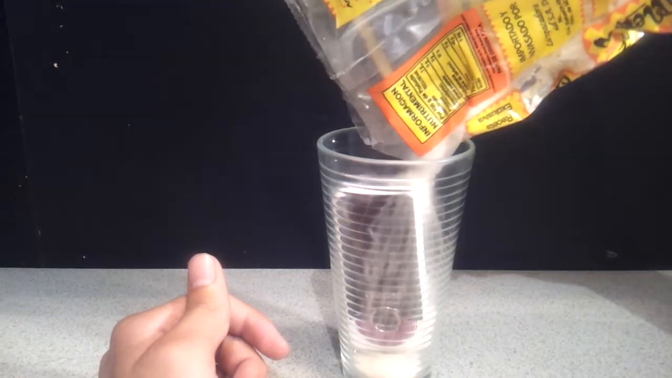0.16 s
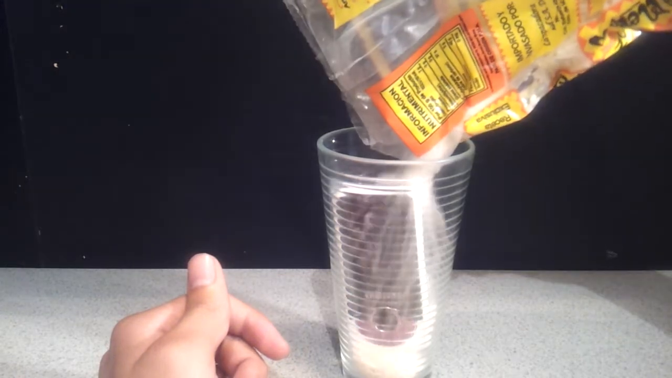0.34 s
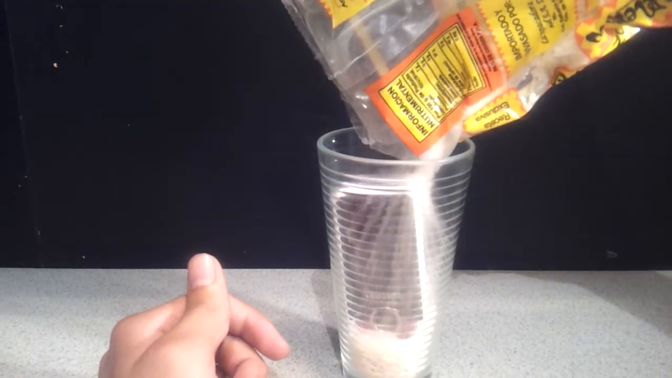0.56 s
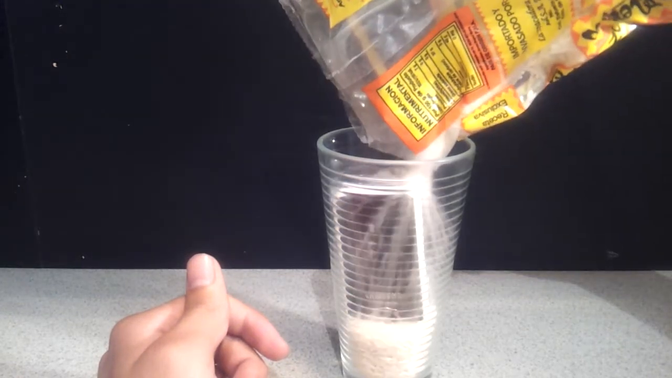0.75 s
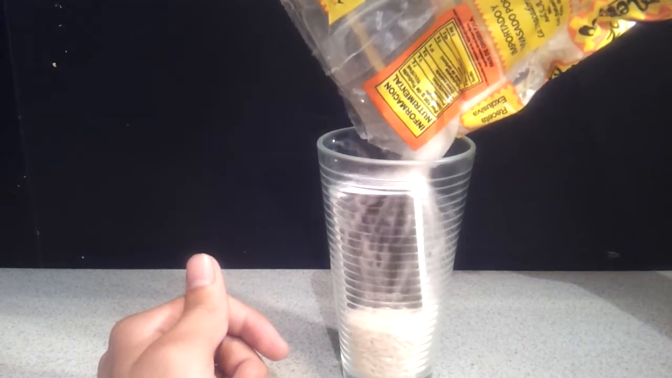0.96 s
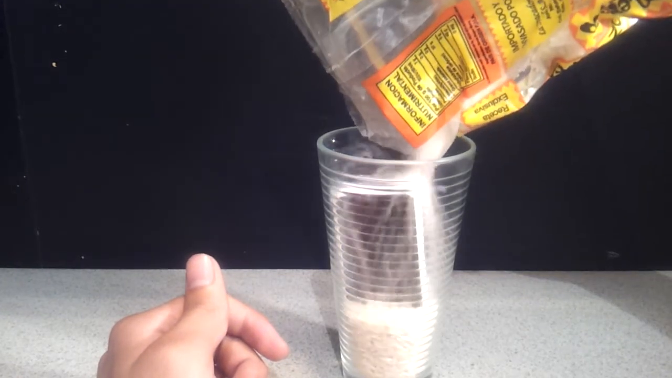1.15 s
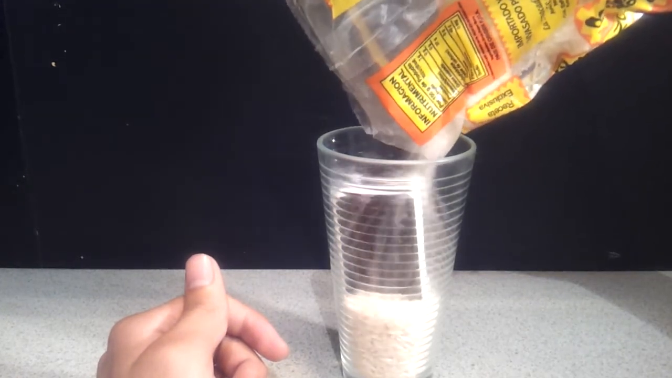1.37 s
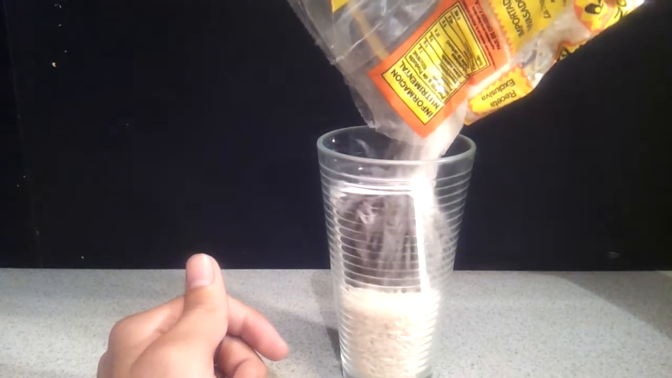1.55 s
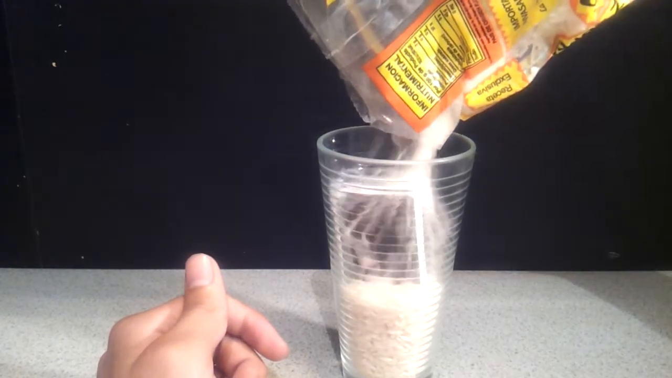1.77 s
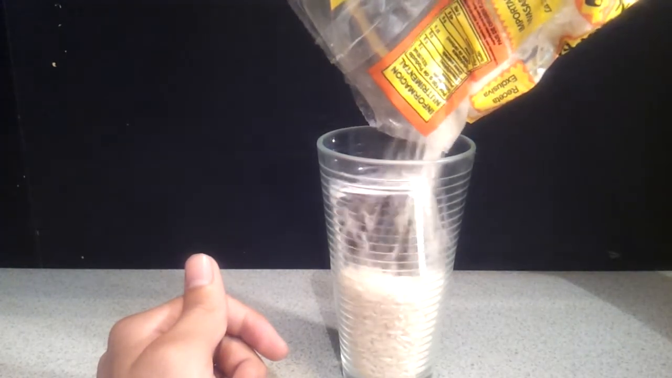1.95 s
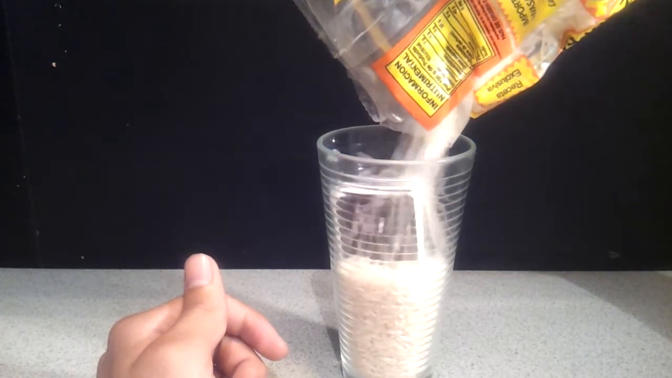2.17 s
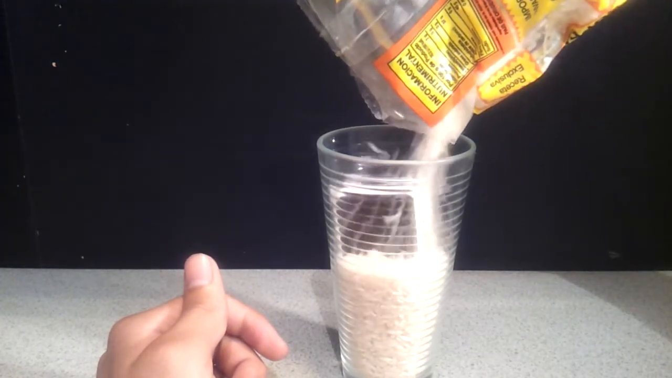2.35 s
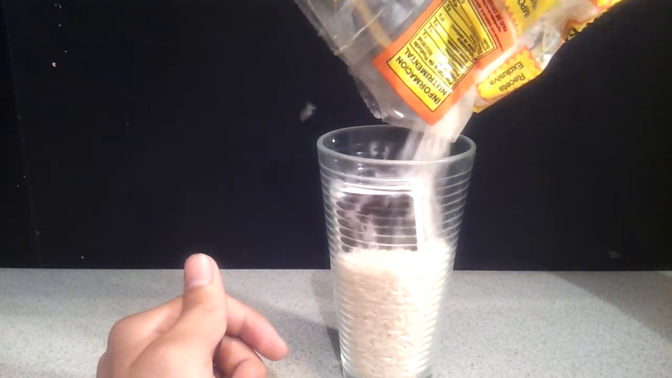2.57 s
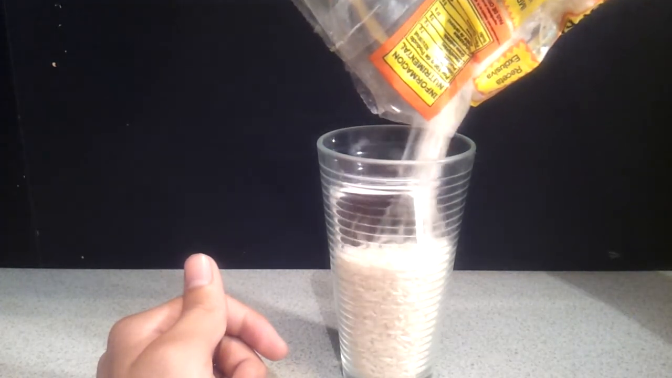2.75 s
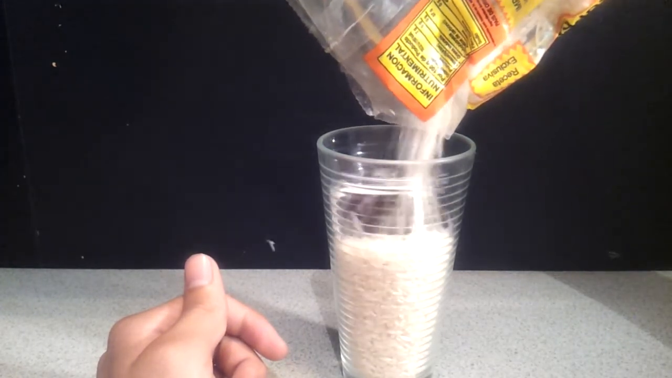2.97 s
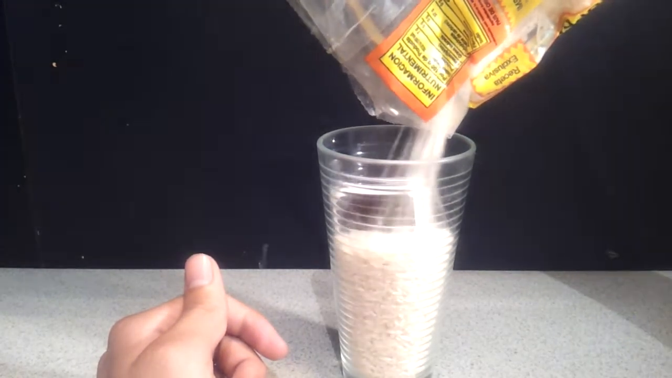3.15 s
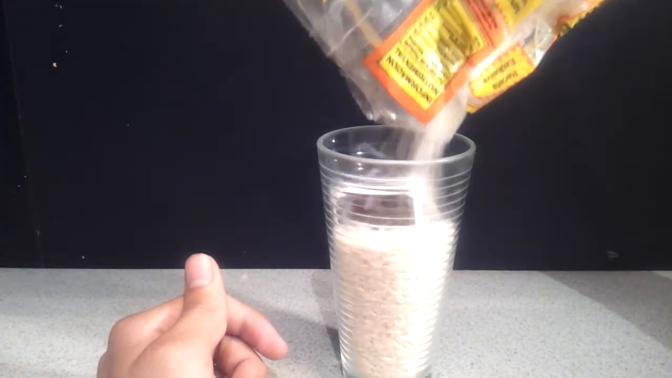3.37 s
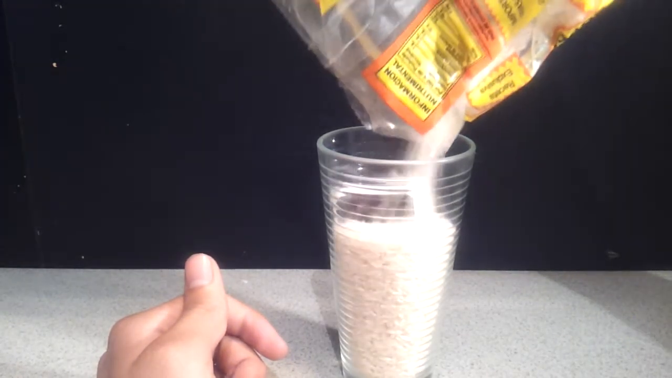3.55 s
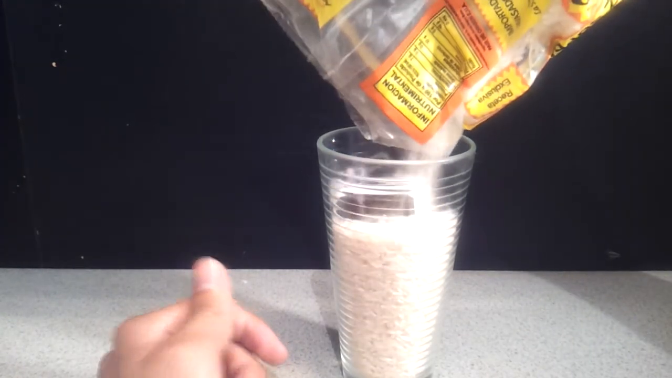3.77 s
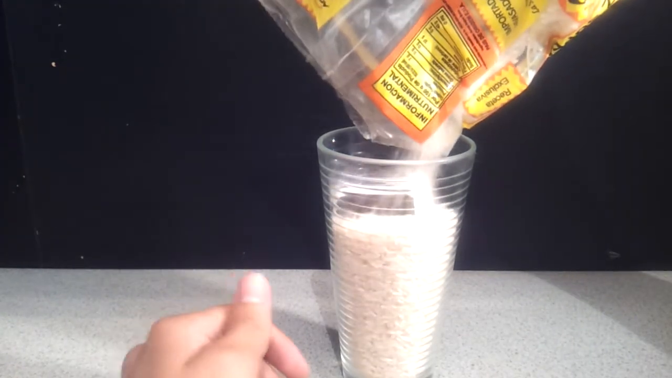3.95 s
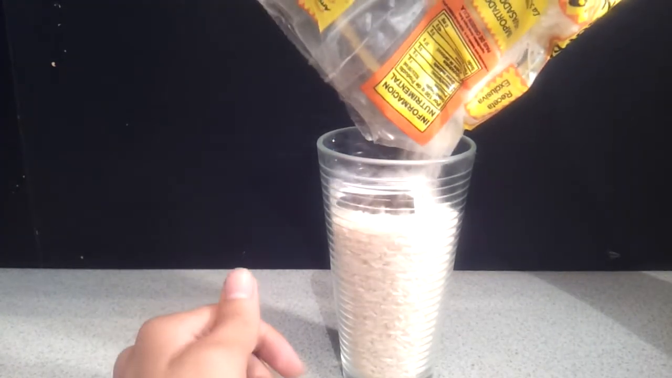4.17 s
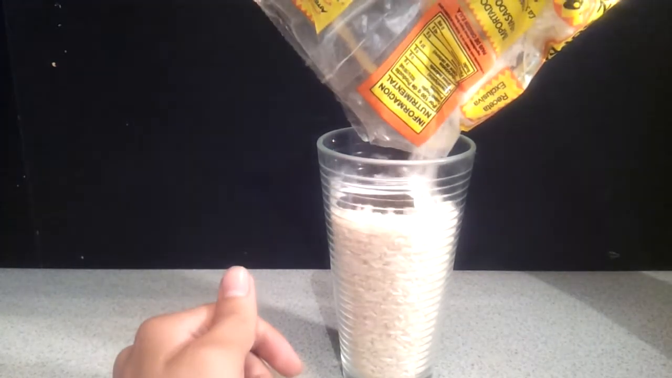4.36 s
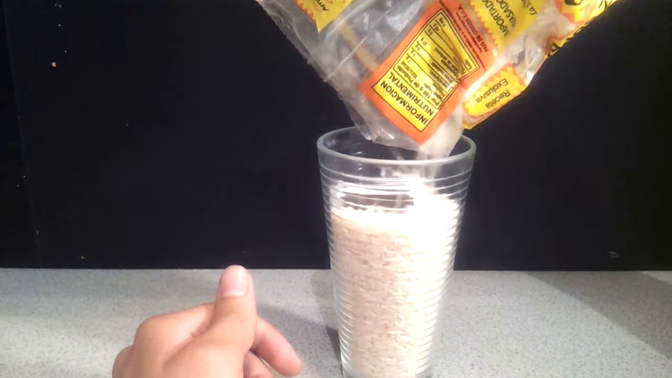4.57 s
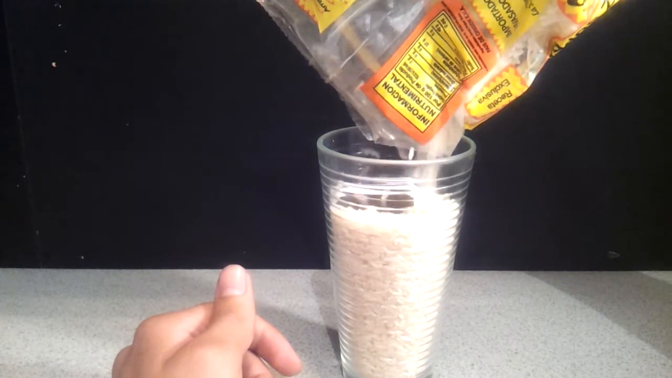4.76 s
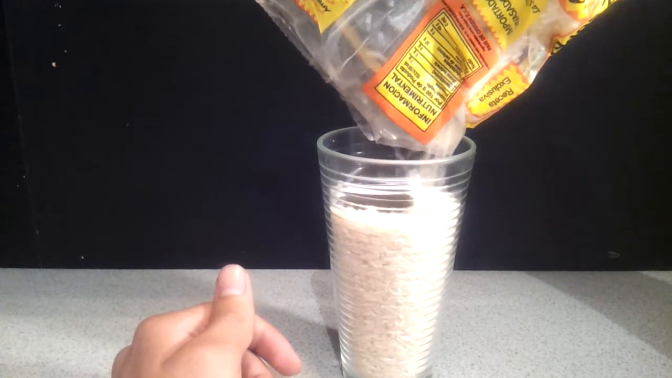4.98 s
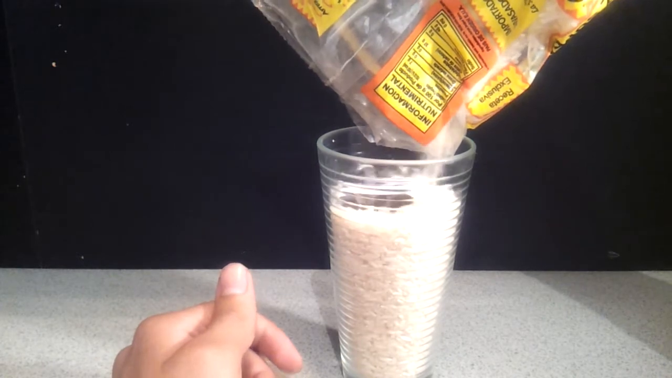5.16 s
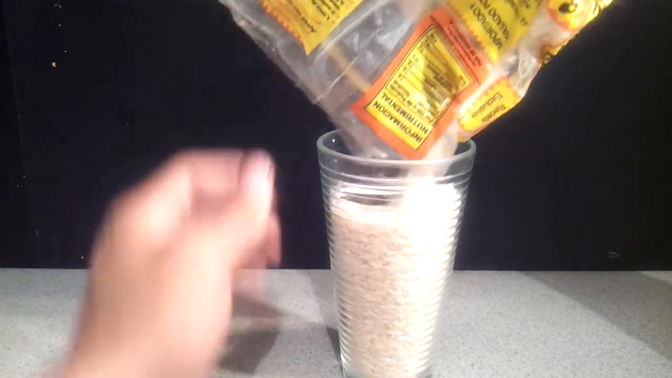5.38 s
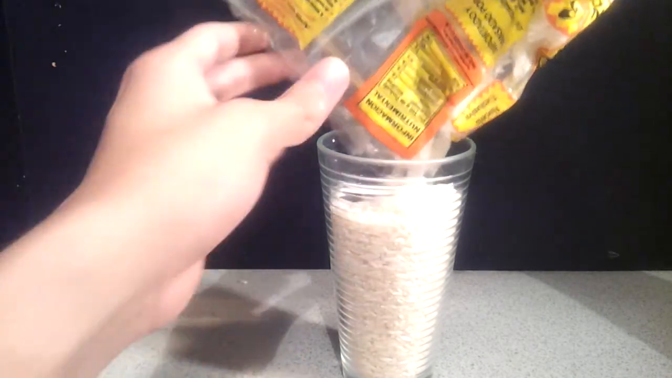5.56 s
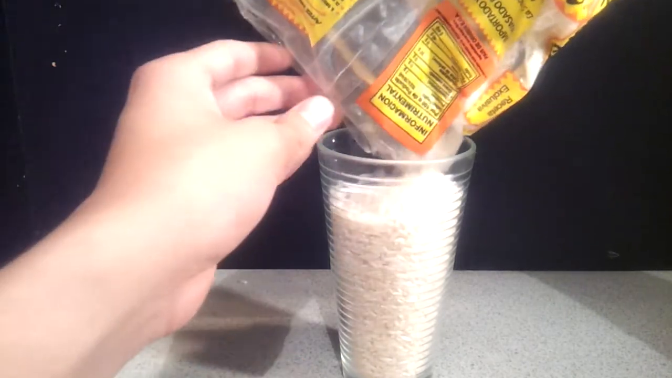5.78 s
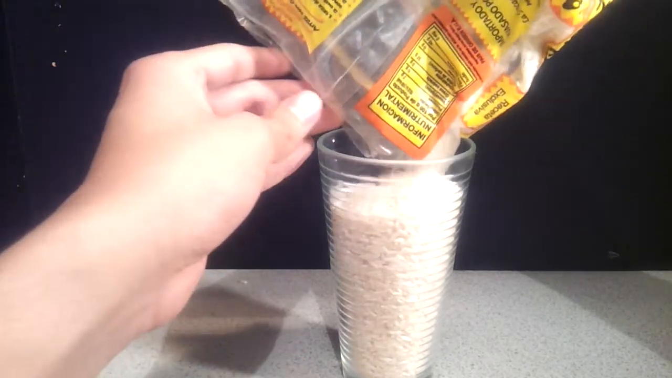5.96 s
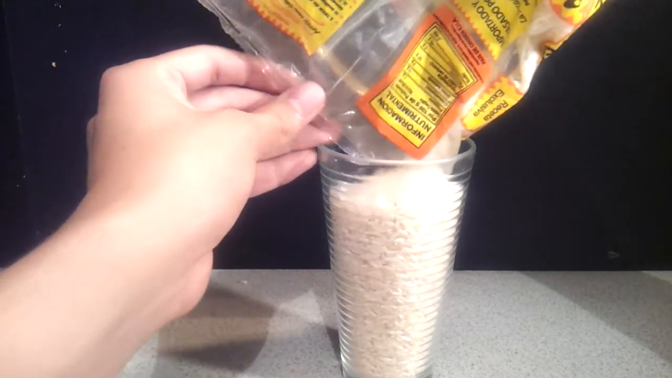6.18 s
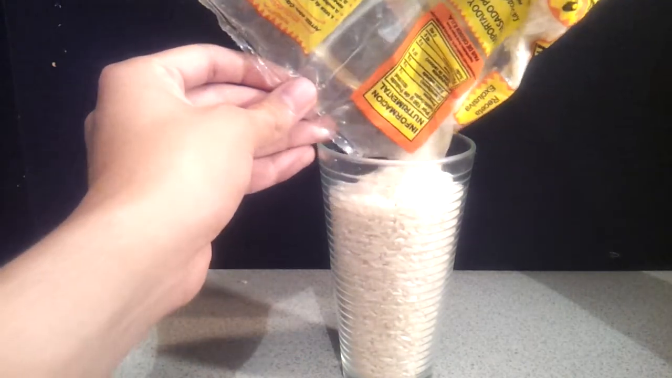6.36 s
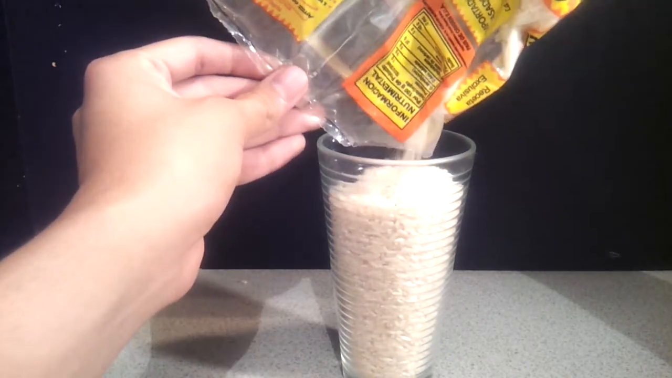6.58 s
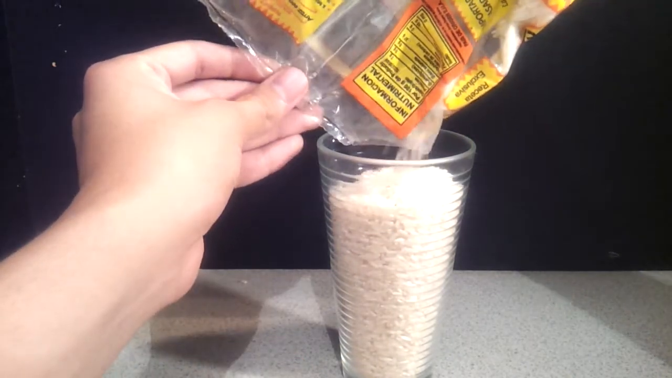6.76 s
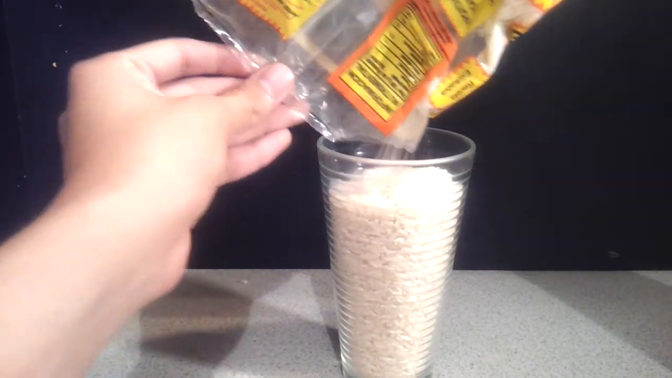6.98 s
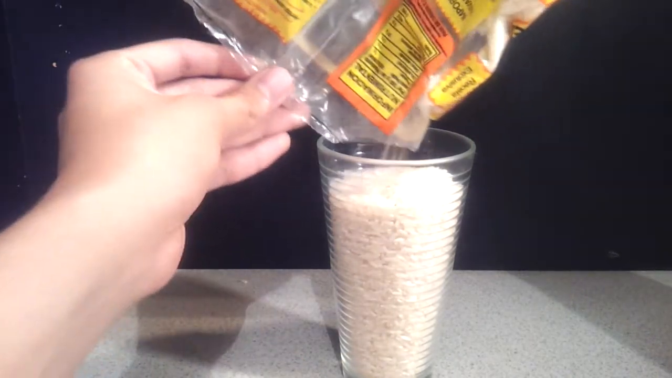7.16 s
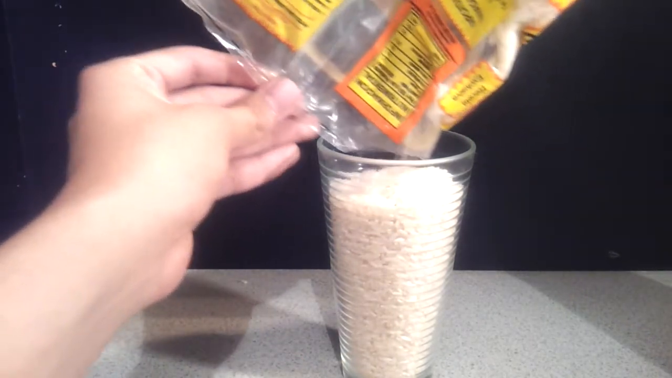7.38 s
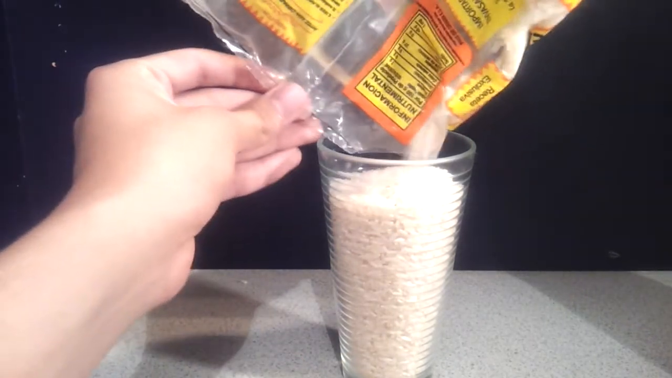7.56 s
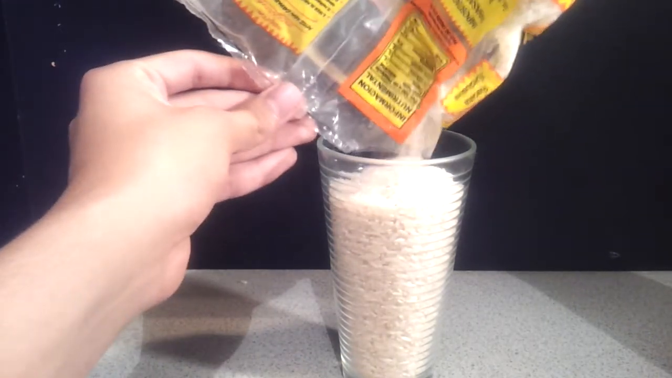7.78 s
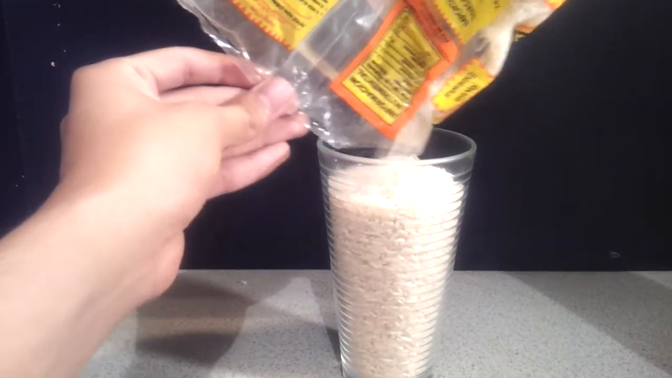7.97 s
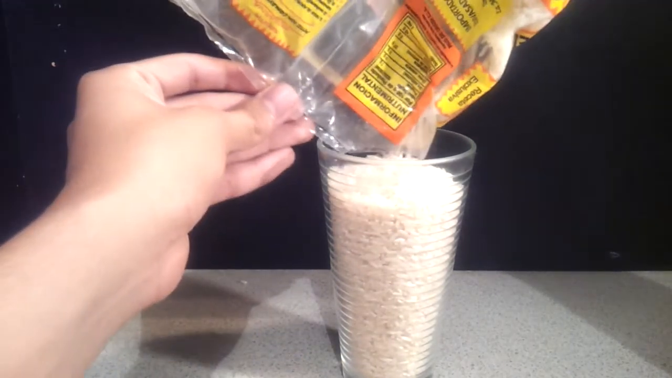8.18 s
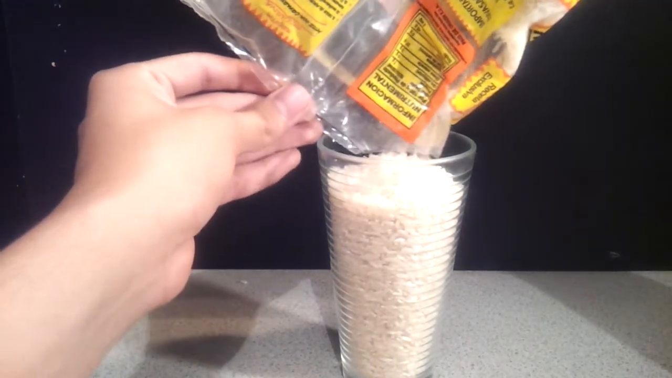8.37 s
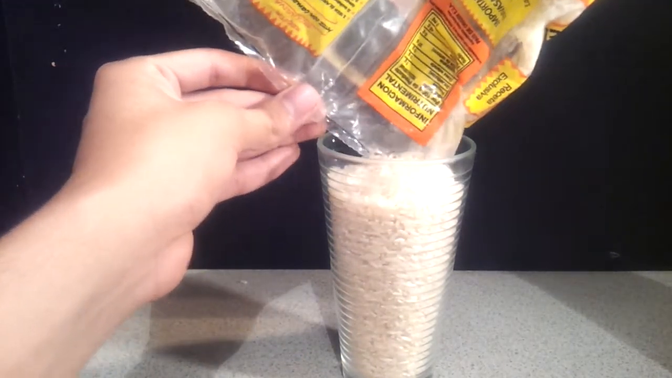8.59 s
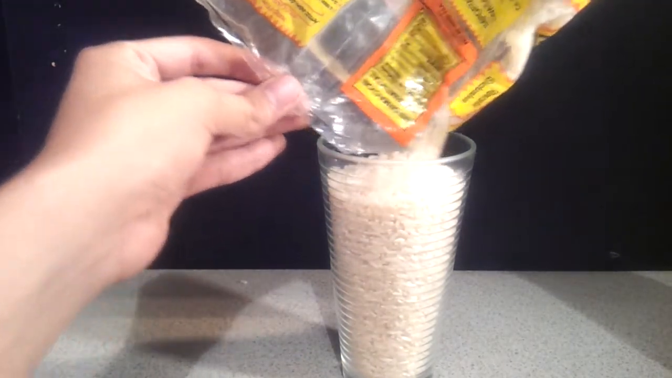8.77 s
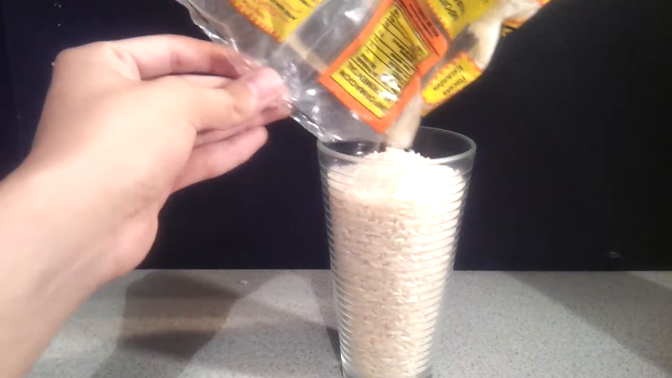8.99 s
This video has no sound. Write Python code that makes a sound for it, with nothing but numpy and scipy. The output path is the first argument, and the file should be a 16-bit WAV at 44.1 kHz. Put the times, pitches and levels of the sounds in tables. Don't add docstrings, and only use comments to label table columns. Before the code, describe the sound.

A close, steady rattle of rice grains filling a glass, with bright glassy tinkling, plastic film crackles, and sparse ticks at the end.

```python
import sys
import numpy as np
from scipy import signal
from scipy.fft import rfft, irfft
from scipy.io import wavfile
from scipy.ndimage import uniform_filter1d

SR = 44100
rng = np.random.default_rng(int(sys.argv[2]) if len(sys.argv) > 2 else 0)


def put_to_file(sound):
    columns = np.atleast_2d(sound).T
    safe = np.clip(columns, -1, 1)
    whole_steps = np.round(safe * 32767)
    wavfile.write(sys.argv[1], SR, whole_steps.astype(np.int16))


def voltage_ratio(decibels):
    exponent = np.asarray(decibels, float) / 20
    return 10 ** exponent


N = 397782
T = np.arange(N) / SR


def evened(x):
    return x / np.sqrt(np.mean(abs(x) ** 2) + 1e-20)


def read(points, hz):
    f, value = np.transpose(points)
    return np.interp(np.log(hz + 1), np.log(f + 1), value)


def curve(rows, column):
    rows = np.array(rows)
    return np.interp(T, rows[:, 0], rows[:, column])


def band(x, lo_hz, hi_hz):
    y = signal.sosfilt(signal.butter(2, [lo_hz, hi_hz], "bandpass", fs=SR, output="sos"), x)
    return y / abs(y).max()


def surge(hz, depth_db):
    sos = signal.butter(1, [hz / 5, hz], "bandpass", fs=SR, output="sos")
    wobble = signal.sosfilt(sos, rng.standard_normal(N))
    return voltage_ratio(depth_db * evened(wobble))


def hits(per_s, spread_db):
    size = voltage_ratio(spread_db * np.minimum(rng.exponential(1, N), 5))
    return evened(size * rng.choice([-1., 1.], N) * (rng.random(N) < per_s / SR))


def bursts(rows, tilt=False):
    rise_s = 0.011
    power = np.zeros(N)
    for s, db, length_s, lift_db in rows:
        at = slice(round(s * SR), round((s + length_s * np.pi) * SR))
        u = T[at] - s
        shape = np.clip(u / rise_s, 0, 1) * np.exp(-(u / length_s) ** 2)
        power[at] += (voltage_ratio(db + tilt * lift_db) * shape) ** 2
    return power


def paths(colour, t60, count=4, size=8192):
    # f/Hz, share 0-1
    shared_sound = [(60, 0.5), (150, 0.5), (380, 0.71), (950, 0.57), (2380, 0.42), (5980, 0.067),
                    (15000, 0.13)]
    hz = np.fft.rfftfreq(size, 1 / SR)
    edge = (hz < colour[0][0]) | (hz > colour[-1][0])
    log_gain = np.log(voltage_ratio(np.where(edge, -70, read(colour, hz))))
    full = np.concatenate([log_gain, log_gain[-2:0:-1]])
    click = np.exp(log_gain - 1j * signal.hilbert(full).imag[:len(hz)])
    t = np.arange(size // 2) / SR
    tail = rng.standard_normal((count, 2, len(t))) * voltage_ratio(-60 * t / t60) * (t > .0012)
    tail = rfft(tail / np.linalg.norm(tail, axis=-1, keepdims=True), size)
    direct = np.clip(read(shared_sound, hz), .02, .98)
    answer = irfft(click * (np.sqrt(direct) + np.sqrt(1 - direct) * tail), size)
    return answer / np.sqrt((answer ** 2).sum(-1).mean())


def scatter(train, answers):
    spot = rng.integers(0, len(answers), N)
    return sum(signal.oaconvolve((train * (spot == k))[None], a, axes=1)[:, :N]
               for k, a in enumerate(answers))


def hiss():
    colour = [(150, -50), (300, -21), (3000, -6), (15000, 20)]  # f/Hz, level/dB
    spectrum = rfft(rng.standard_normal((2, N))) * voltage_ratio(read(colour, np.fft.rfftfreq(N, 1 / SR)))
    return voltage_ratio(-45.5) * evened(irfft(spectrum, N))


def handling():
    # t/s, level/dB
    arm_moves = [(0.0, -75), (2.3, -71), (2.9, -68.5), (5.3, -69.5), (5.55, -55), (5.75, -73),
                 (6.12, -56.5), (6.56, -67.5), (9.02, -69)]
    # f/Hz, level/dB
    table_colour = [(20, -41), (55, -27), (80, -14), (105, -6.5), (125, 0.5), (155, -8), (190, -5.5),
                    (240, -37)]
    shudder = hits(per_s=1200, spread_db=2.0) * surge(hz=9.3, depth_db=3.0)
    return scatter(shudder * voltage_ratio(curve(arm_moves, column=1)), paths(table_colour, 0.041, count=6))


def slack_snaps():
    # t/s, peak level/dB, centre of the dull ring f/Hz, upper ring level/dB
    slack_events = [(0.494, -22, 2150, -15), (0.918, -12, 1810, -6), (1.025, -18.5, 1870, -24),
                    (1.509, -17.5, 1600, -2.5), (1.6043, -19, 1730, -16), (1.6184, -16, 1590, -23),
                    (1.672, -9.5, 2000, -24), (1.7444, -20, 1550, -15), (2.0977, -15, 2430, -17),
                    (2.122, -9.5, 1890, -28), (3.0693, -19, 1870, -5), (3.1313, -18, 2060, -4),
                    (3.2394, -22, 1580, 4), (3.511, -12, 1950, -28), (3.524, -10.5, 1860, -36),
                    (4.12, -16, 2030, -2), (5.394, -15.5, 1350, -9), (5.436, -18, 1250, -2),
                    (5.455, -16, 1530, -17), (5.535, -10, 1820, -27), (5.777, -22, 1920, -22),
                    (5.8083, -18, 1830, -18)]
    crack_db, fold, creases_s = -19.5, 2.5 * 0.21, 0.052
    return [(*row, crack_db, fold, creases_s) for row in slack_events]


def shaken_buckles():
    # t/s, peak level/dB, centre of the dull ring f/Hz
    main_buckles = [(4.3773, -15, 1540), (4.3964, -9.5, 1770), (4.4297, -13.5, 1900), (4.4565, -20, 1660),
                    (4.4864, -17.5, 1460), (4.51, -16, 1550), (4.545, -13, 1920), (4.551, -17, 1940),
                    (4.572, -13, 1990), (4.608, -14, 1630), (4.637, -15.5, 2000), (4.6934, -11, 1980),
                    (4.7078, -9, 2140), (4.7136, -17.5, 2400), (4.754, -15, 1840), (4.79, -11.5, 1540),
                    (4.8164, -13, 2570), (4.8434, -24, 1260), (4.854, -15.5, 1710), (4.8884, -17, 2000),
                    (4.899, -11, 1770), (4.964, -23.5, 1290), (5.0213, -12.5, 1720), (5.037, -10, 1900),
                    (5.101, -22, 1360), (5.332, -27, 1210)]
    # t/s, peak level/dB, centre of the dull ring f/Hz
    lesser_creases = [(4.291, -27, 1570), (4.5057, -19, 1200), (4.5844, -25, 1870), (4.661, -22, 1970),
                      (4.724, -24, 2430), (4.764, -24, 1750), (4.8016, -18, 2070), (4.8742, -17, 2030),
                      (4.9394, -26, 1950), (4.994, -24, 1250), (5.1423, -30, 1990), (5.23, -26, 1920),
                      (5.258, -22, 1870), (5.2984, -27, 1810), (5.3653, -17, 1630), (5.4198, -21, 1210),
                      (5.4824, -26, 1270), (5.5044, -21, 1250), (5.5794, -20, 1250), (5.625, -12, 1750),
                      (5.6344, -21, 1180), (5.6648, -21, 1250), (5.6986, -27, 2010), (5.7563, -22, 1270),
                      (5.8496, -18.5, 1830), (6.0244, -36, 1860), (6.0571, -27, 1880), (6.0888, -17, 1690),
                      (6.128, -24, 1850), (6.151, -21, 1870), (6.2644, -26, 1240), (6.3444, -20, 1900),
                      (6.476, -20, 2110)]
    upper_db, crack_db, fold, creases_s = -22, -19.5, 1, 0.046
    return [(*row, upper_db, crack_db, fold, creases_s) for row in main_buckles + lesser_creases]


def pinches():
    # t/s, peak level/dB, centre of the dull ring f/Hz, upper ring level/dB, crack level/dB
    pinch_events = [(6.1077, -19, 1180, 0, 3), (6.1137, -10, 1660, -0.5, -14), (6.145, -9, 1800, -8, -10),
                    (6.159, -16.5, 1580, -8, 0.5), (6.2417, -17, 2010, -16, -20),
                    (6.3946, -20, 1820, 3, -8), (6.5794, -14, 2080, -6, -27),
                    (6.7248, -20, 1840, -1.5, -11), (6.8342, -15, 1900, -1.5, -12),
                    (7.0872, -13, 2000, -3, -10), (7.1116, -17.5, 2200, 2, -8), (7.221, -21, 1310, 3, -4),
                    (7.4, -30, 1900, -5, -6), (7.5183, -17, 1840, -15, -28), (7.622, -21, 1260, 2, -18),
                    (7.6457, -16, 1820, -19, -18), (7.711, -15.5, 1910, 4.5, -1.5),
                    (7.8542, -20, 1420, -7, -13), (8.123, -22, 1980, 4, -13), (8.233, -30, 1270, 12, -18),
                    (8.329, -26, 1700, 9, -22), (8.4174, -23, 1850, 3, -20)]
    fold, creases_s = 2.5, 0.024
    return [(*row, fold, creases_s) for row in pinch_events]


def heap_taps():
    # t/s, peak level/dB, centre of the ring f/Hz
    tap_events = [(7.2903, -39, 3040), (7.3213, -24, 3210), (7.3864, -23, 3080), (7.5383, -22, 3230),
                  (7.579, -18, 3280), (7.7897, -18.5, 3210), (7.8186, -17, 3200), (7.883, -29, 3300),
                  (7.918, -23, 3780), (8.0351, -27, 3240), (8.084, -28, 3220), (8.1458, -19, 3660),
                  (8.1968, -20, 3160), (8.2744, -33, 3120), (8.5265, -20, 3210), (8.5894, -22, 3180),
                  (8.633, -23, 3180), (8.6852, -32, 3210), (8.783, -31, 3200), (8.8478, -32, 3700),
                  (8.9431, -23, 3290)]
    upper_db, crack_db, fold, tap_s = -12, -22, 1, 0.023
    return [(*row, upper_db, crack_db, fold, tap_s) for row in tap_events]


def bag():
    events = slack_snaps() + shaken_buckles() + pinches() + heap_taps()
    out, t = np.zeros((2, N + 4096)), np.arange(2048) / SR
    for s, db, hz, upper_db, crack_db, fold, creases_t60 in events:
        noise = rng.standard_normal((3, len(t)))
        burst = fold * np.exp(-t / 0.00031) + voltage_ratio(-60 * t / creases_t60)
        near = (noise[0] + .5 * noise[1:]) * burst
        snap = band(near, hz * 0.76, hz * 1.4)
        snap += voltage_ratio(-11.5) * band(near[::-1], 1067, 1524)
        snap += voltage_ratio(upper_db + 4.0) * band(near * burst ** 0.55, 3020, 4250)
        snap += voltage_ratio(crack_db + 12.0) * band(noise[1:] * burst ** 1.2, 5800, 10460)
        at = round((s + .0004) * SR)
        out[:, at:at + len(t)] += voltage_ratio(db - 5.0) * snap
    t = np.arange(3000) / SR
    echoes = rng.standard_normal((2, len(t))) * voltage_ratio(-60 * t / 0.052) * (t > .0015)
    echoes = voltage_ratio(-5.5) * echoes / np.linalg.norm(echoes, axis=1, keepdims=True)
    return (out + signal.oaconvolve(out, echoes, axes=1)[:, :out.shape[1]])[:, :N]


def stream(tilt=False):
    # t/s, level/dB
    slow_pour = [(0.0, -35), (0.8, -35.5), (1.28, -37.5), (1.63, -33.5), (1.81, -36), (2.86, -37.5),
                 (3.16, -35.5), (3.62, -38), (5.2, -38.5), (5.48, -33.5), (5.755, -35.5), (5.79, -39.5),
                 (6.23, -37.5), (7.19, -43.5), (7.74, -33.5), (7.94, -37), (8.62, -38), (9.02, -45.5)]
    # t/s, level/dB, length/s, lift of the ticking/dB
    slump_events = [(0.846, -34.5, 0.095, 4.5), (0.91, -36, 0.07, 4.5), (0.99, -38, 0.018, 9),
                    (1.02, -38, 0.045, 6), (1.14, -35, 0.012, 12.5), (1.57, -39.5, 0.092, 8.5),
                    (3.48, -31.5, 0.07, -12), (3.9, -49, 0.64, -21), (4.388, -34, 0.21, -2.5),
                    (4.528, -38, 0.35, -2), (4.689, -31, 0.033, 1), (4.78, -36, 0.15, 1.5),
                    (4.89, -34.5, 0.038, -16), (5.026, -40, 0.029, 11.5), (5.225, -44, 0.059, -8),
                    (5.45, -26.5, 0.23, -6.5), (5.57, -40, 0.14, -6), (5.66, -35.5, 0.07, -11),
                    (6.088, -28.5, 0.11, -1.5), (6.2, -37.5, 0.28, -17), (6.936, -36, 0.021, -3),
                    (7.085, -39.5, 0.05, -10), (7.22, -43.5, 0.12, 2), (7.38, -36, 0.056, -9),
                    (7.71, -34, 0.077, 2), (7.79, -39, 0.065, 9.5)]
    return 10 * np.log10(voltage_ratio(2 * curve(slow_pour, column=1)) + bursts(slump_events, tilt))


def places():
    # t/s, share in the bag 0-1, share at the rim 0-1; the rest is deep in the glass
    rattle_shares = [(0, 0.06, 0.02), (2.8, 0.05, 0.05), (3.5, 0.66, 0), (4.2, 0.13, 0), (4.4, 1, 0),
                     (5.8, 0.99, 0.01), (6.3, 0.5, 0.32), (6.9, 0.24, 0.68), (9.02, 0.66, 1)]
    sack, brim = (np.clip(curve(rattle_shares, column=k), 0, 1) for k in (1, 2))
    return np.clip(1 - sack - brim, 0, 1), sack, brim


def tick_level():
    under_rattle_db = (-7.5, -11, -13)
    shares = np.array(places())
    return voltage_ratio(stream(tilt=True) + np.dot(under_rattle_db, shares) / shares.sum(0))


def ring(drive, width_hz):
    r = np.exp(-np.pi * width_hz / SR)
    return signal.lfilter([np.sqrt(2 * (1 - r ** 2))], [1, -r], drive, axis=1)


def rim_level(k):
    # t/s, level/dB
    rim_brush = [(0.0, -47), (0.4, -47), (0.6, -42), (0.95, -40), (1.75, -37.5), (2.7, -41.5), (3.4, -43),
                 (4.1, -42.5), (4.5, -49.5), (5.0, -43.5), (5.5, -49), (6.2, -53), (7.1, -69), (7.8, -61),
                 (9.02, -62)]
    # t/s, level/dB, length/s, lift of the highest rim mode/dB
    edge_clips = [(1.5417, -30, 0.03, -4), (1.673, -27, 0.034, -11), (1.784, -24, 0.028, -3),
                  (1.9508, -43, 0.027, -7), (2.0975, -31, 0.034, 1), (2.267, -33, 0.036, -4),
                  (2.319, -26, 0.033, -14), (2.414, -33, 0.033, -2), (2.527, -24, 0.036, -12),
                  (2.6213, -26.5, 0.033, -6), (2.6856, -51, 0.023, -9), (2.824, -26, 0.038, 4),
                  (3.123, -33, 0.03, -6), (3.204, -27, 0.03, 2), (3.3506, -33, 0.03, -9),
                  (3.502, -26, 0.03, -11), (3.582, -26, 0.072, -6), (3.762, -31, 0.027, 4),
                  (3.838, -32, 0.035, 2), (4.04, -29, 0.037, -4), (4.27, -24.5, 0.037, -4),
                  (4.373, -43, 0.027, -4), (4.4307, -28, 0.03, -4), (4.545, -35, 0.026, 0),
                  (4.686, -27, 0.03, -4), (4.7953, -41, 0.03, -4), (4.964, -34, 0.027, -8),
                  (5.064, -25.5, 0.028, -7), (5.133, -28, 0.038, -4), (5.302, -29, 0.03, -4),
                  (5.3735, -39, 0.02, -8), (5.4733, -41, 0.03, -8), (5.679, -26.5, 0.03, -9.5),
                  (5.856, -37, 0.025, -16), (6.038, -32, 0.043, -11), (6.164, -40, 0.03, -4),
                  (6.75, -39, 0.03, 3), (6.8337, -50, 0.03, -4), (7.09, -41, 0.03, -7),
                  (7.51, -50, 0.027, -9), (7.7162, -33, 0.03, -4), (7.8384, -42, 0.03, 0),
                  (7.983, -31, 0.027, 1), (8.228, -49, 0.024, -6), (8.63, -30.5, 0.02, 0),
                  (8.7349, -35, 0.033, -6), (8.937, -35, 0.03, -8), (8.997, -42, 0.03, -6)]
    mode_db = (-3, -0.5, -19.5)[k]
    fade_db_per_s = (-0.1, 1, -2.4)[k]
    brush = voltage_ratio(curve(rim_brush, column=1) + mode_db - fade_db_per_s * T)
    clip_db = -10.5
    if k == 0:
        clip_db = clip_db - 4 - fade_db_per_s * T
    if k == 2:
        clip_db = clip_db + np.minimum(1.1 * T - 6.4, 0)
    return np.sqrt(brush ** 2 + bursts(edge_clips, tilt=k == 2) * voltage_ratio(2 * clip_db))


def glass(clumps):
    # f/Hz, rise once buried/Hz
    mode_pitches = [(4622, -10), (7958, 70), (12160, 30), (5845, 30), (8790, 150), (11850, 150),
                    (13160, 15), (13297, 15), (7500, 200)]
    # width/Hz, level/dB, loss once buried/dB, buried at t/s, left minus right/dB, left lead/rad
    mode_rings = [(14.4, 4.5, 10, 4.98, 4.5, 1.3), (19.7, 2.5, -1, 5.2, -7, -1.5),
                  (30, 3.5, 4, 6.3, -3.5, 1), (49, 1, 20, 1.74, -0.5, 1), (28.5, 3, 27, 3.6, 0, 0.7),
                  (60, -7.5, 6, 2.9, -11.5, -3.5), (55, -5.5, 33, 4.5, -13.5, -0.5),
                  (50, -2, 31, 5.5, -1, 1.4), (495, -2.5, 36, 2.2, 1, -0.5)]
    rim_modes, alike, buried_width = 3, .7, 2.4
    out = np.zeros((2, N))
    shower = hits(per_s=1900, spread_db=3.0) * clumps ** 0.37 * tick_level() * voltage_ratio(4.0)
    strays = hits(per_s=1100, spread_db=3.0)
    for k, ((hz, rise_hz), mode) in enumerate(zip(mode_pitches, mode_rings)):
        width_hz, db, loss_db, buried_s, pan_db, lead = mode
        buried = 1 / (1 + np.exp((buried_s - T) / .5))
        turn = np.exp(2j * np.pi * np.cumsum(hz + rise_hz * buried) / SR)
        strikes = strays * rim_level(k) if k < rim_modes else shower
        drive = strikes * voltage_ratio(db - loss_db * buried) * rng.standard_normal((2, N))
        bare, covered = np.split(drive / turn, [round(buried_s * SR)], axis=1)
        one, twin = turn * np.hstack([ring(bare, width_hz), ring(covered, width_hz * buried_width)])
        out[0] += voltage_ratio(pan_db / 2) * (one * np.exp(1j * lead)).real
        out[1] += voltage_ratio(-pan_db / 2) * (alike * one + np.sqrt(1 - alike ** 2) * twin).real
    return out


def grains(clumps):
    # f/Hz, level/dB per Hz
    deep_colour = [(470, -4.5), (800, -3), (973, -7), (1180, 3.5), (1380, -0.5), (1880, 6), (2580, 2),
                   (3580, 0.5), (4390, 6.5), (4490, -9), (4760, -3), (4880, -5), (5600, -1), (7280, -8),
                   (12300, -120)]
    # f/Hz, level/dB per Hz
    sack_colour = [(470, -13.5), (800, -13), (1000, -11), (1230, 0), (1430, -5.5), (1700, -4), (1980, 0.5),
                   (2230, -11), (2480, -5.5), (2900, -8), (3880, -9.5), (4300, -8.5), (5600, -24),
                   (7300, -54)]
    # f/Hz, level/dB per Hz
    brim_colour = [(470, -35), (760, -1), (1010, -8), (1240, -11), (1470, -2.5), (1800, 0), (2350, -9),
                   (2650, -4), (3050, -2.5), (3260, 7), (3500, -4.5), (3750, -4.5), (3950, -4.5),
                   (4230, -0.5), (4700, -13), (7000, -11.5)]
    # f/Hz, level/dB
    tick_colour = [(3500, -63), (4800, 0), (6200, 0.5), (7400, 5.5), (8400, 8), (10000, 2), (12500, 3),
                   (14500, -1), (17000, -10)]
    # f/Hz, level/dB per Hz
    thud_colour = [(100, -40), (170, -7), (188, -14.5), (291, -8), (389, -2.5), (459, -9), (520, -3),
                   (617, -11), (710, -1.5), (863, -8), (912, -14), (1100, -10.5), (1430, -22), (2420, -120)]
    (deep, sack, brim), flow_db = places(), stream()

    rattle = hits(per_s=3000, spread_db=3.5) * clumps * voltage_ratio(flow_db)
    out = scatter(rattle * np.sqrt(deep), paths(deep_colour, 0.083))
    out += scatter(rattle * np.sqrt(sack), paths(sack_colour, 0.092))
    out += scatter(rattle * np.sqrt(brim), paths(brim_colour, 0.086))

    ticks = hits(per_s=7000, spread_db=4.0) * clumps ** 0.44 * tick_level() * voltage_ratio(8.0)
    dull = [(hz, db - 8.2 * np.log2(hz / 7000)) for hz, db in tick_colour]
    out += scatter(ticks * np.sqrt(deep), paths(tick_colour, 0.053))
    out += scatter(ticks * np.sqrt(1 - deep), paths(dull, 0.011))

    thud_db = -45 + 0.86 * (flow_db + 35.5)
    thuds = hits(per_s=2500, spread_db=3.0) * clumps ** 0.58 * voltage_ratio(thud_db)
    return out + scatter(thuds, paths(thud_colour, 0.21))


def scene():
    clumps = evened(surge(hz=27.0, depth_db=1.5))
    small = hiss() + bag() + glass(clumps) + grains(clumps)
    return signal.sosfilt(signal.butter(6, 175, "highpass", fs=SR, output="sos"), small) + handling()


def top_cut(x):
    return signal.sosfilt(signal.butter(12, 15810, fs=SR, output="sos"), x)


def record(dry):
    # f/Hz, left minus right level/dB
    port_balance = [(60, 17), (120, 3), (240, 1.6), (950, -2), (1900, -0.5), (3800, -1), (6000, 1),
                    (7500, -9), (10000, -7.5), (15000, -0.5)]
    # f/Hz, level/dB
    gate_curve = [(4000, -24), (9000, -14), (11500, -6), (13000, -3), (14500, 0)]
    sharp_cracks = [
        7.088,
        7.222,
        7.711,
    ]
    edge_hz, bass_hz = 14560, 290
    hz, _, z = signal.stft(dry, SR, nperseg=2048, noverlap=1536)
    f = hz[:, None]
    tilt_db = read(port_balance, f) / 2
    z = z * voltage_ratio([tilt_db, -tilt_db])

    cell = uniform_filter1d(uniform_filter1d(abs(z) ** 2, size=4, axis=1), size=3, axis=2)
    heard = cell > voltage_ratio(2 * (-71 + read(gate_curve, f)))
    heard |= f < gate_curve[0][0]

    bass = uniform_filter1d((abs(z) ** 2).mean(0), size=3, axis=1)
    treble = uniform_filter1d((abs(z[:, hz > 6000]) ** 2).mean((0, 1)), size=40)
    masked = bass < treble * voltage_ratio(2 * -9 + 8.0 * np.log2((f + 20) / 200))
    z = z * np.where((f < bass_hz) & masked, voltage_ratio(-13), 1)

    body, top = (signal.istft(z * keep, SR, nperseg=2048, noverlap=1536)[1][:, :N]
                 for keep in (heard * (f < edge_hz), f >= edge_hz))
    sharp = sum(np.exp(-((T - s) / .002) ** 2) for s in sharp_cracks)
    return top_cut(body + top * sharp * voltage_ratio(-4))


dry = scene()
out = record(dry)
put_to_file(out)
```